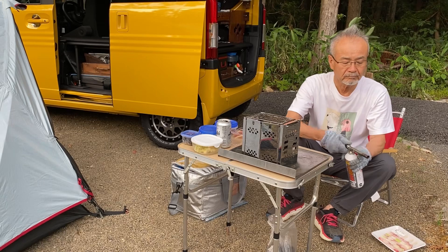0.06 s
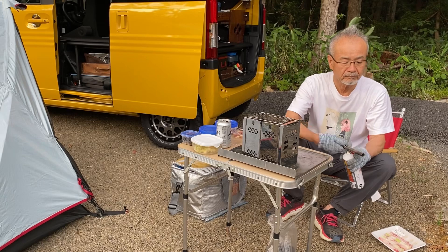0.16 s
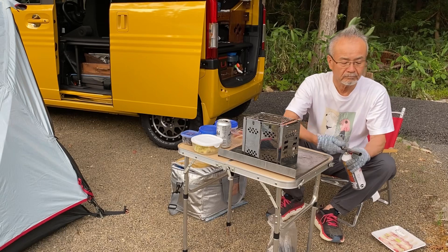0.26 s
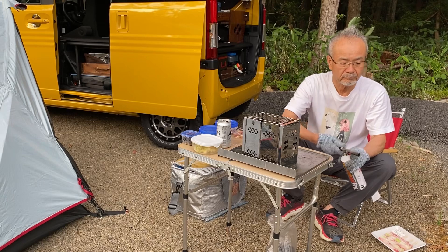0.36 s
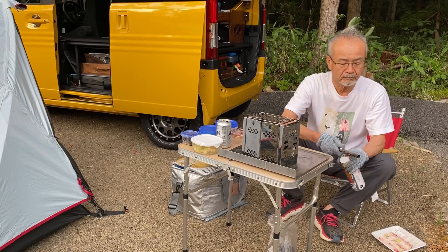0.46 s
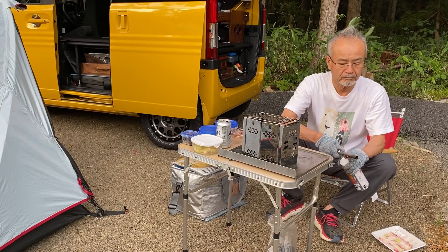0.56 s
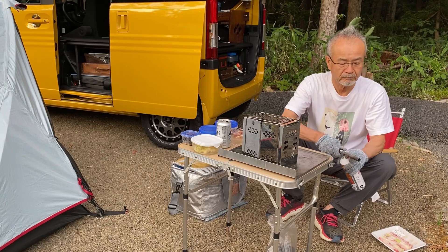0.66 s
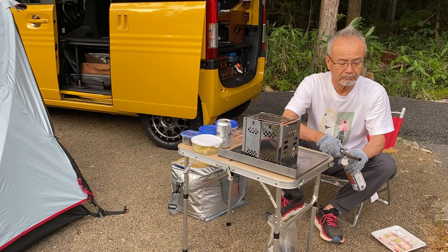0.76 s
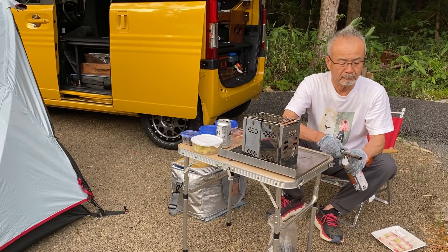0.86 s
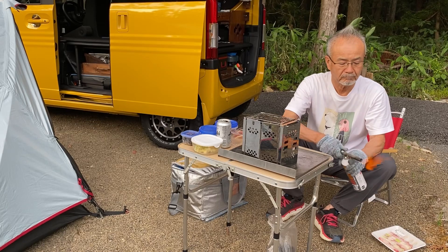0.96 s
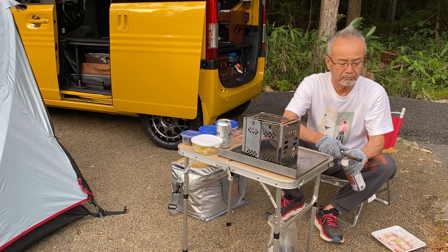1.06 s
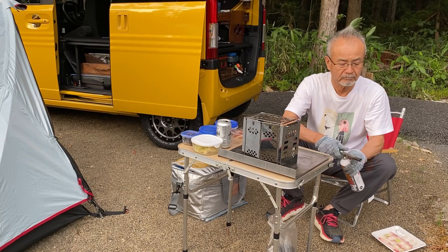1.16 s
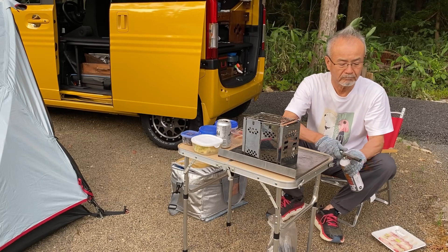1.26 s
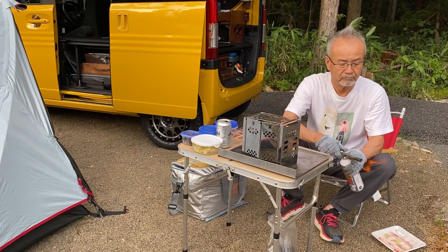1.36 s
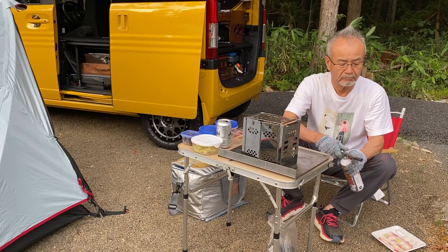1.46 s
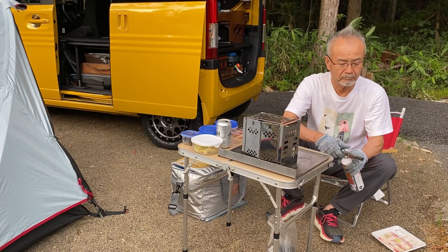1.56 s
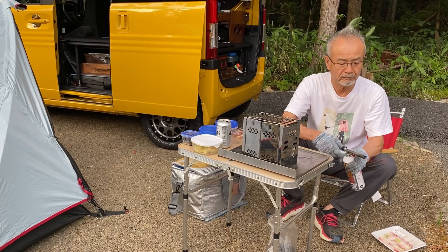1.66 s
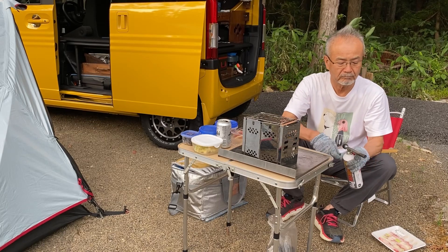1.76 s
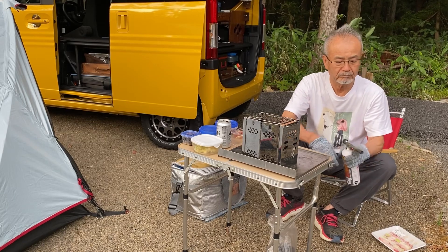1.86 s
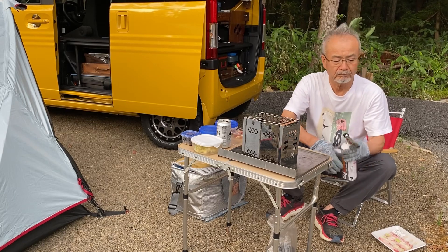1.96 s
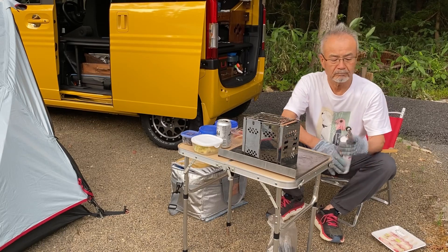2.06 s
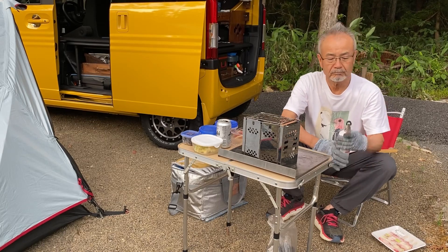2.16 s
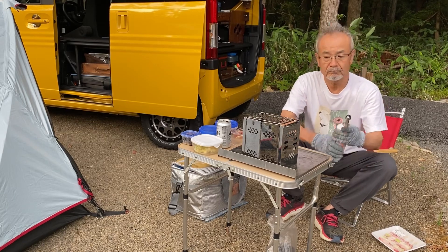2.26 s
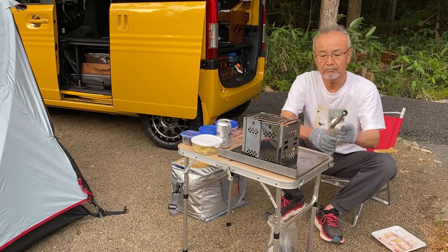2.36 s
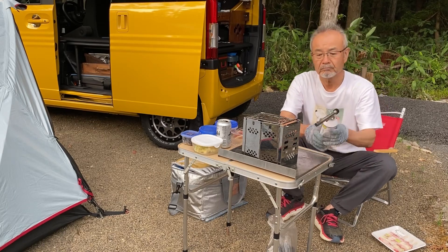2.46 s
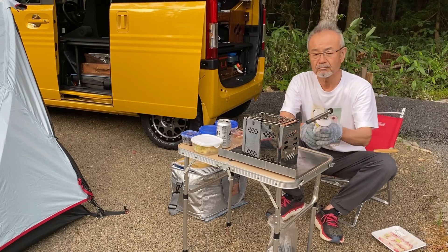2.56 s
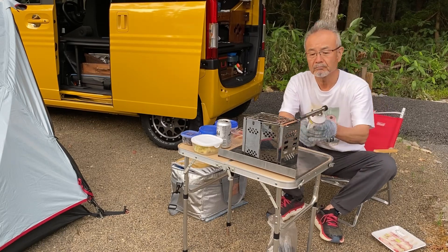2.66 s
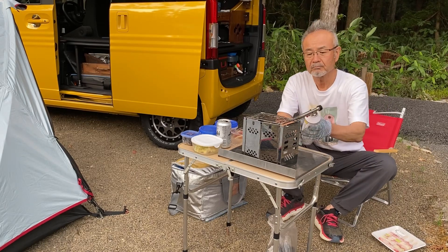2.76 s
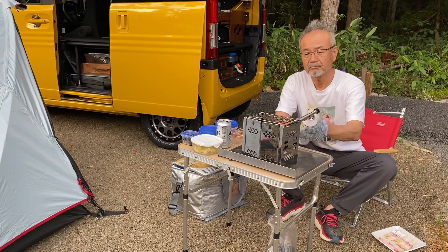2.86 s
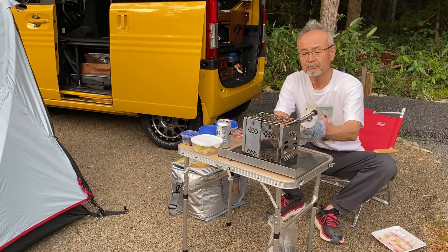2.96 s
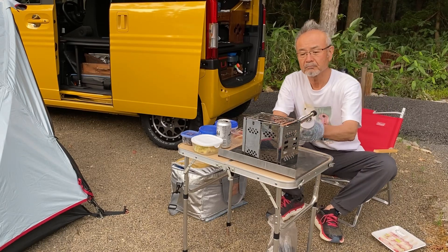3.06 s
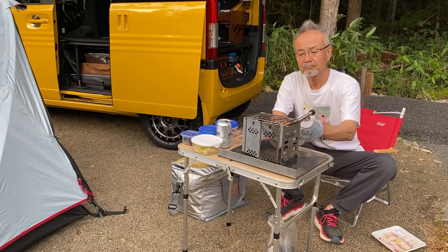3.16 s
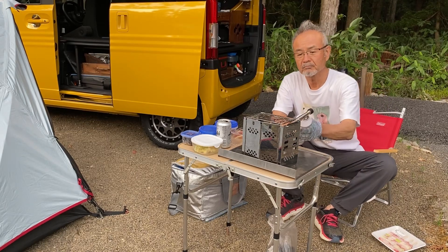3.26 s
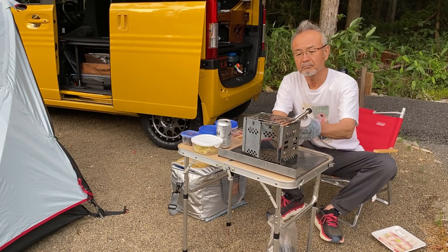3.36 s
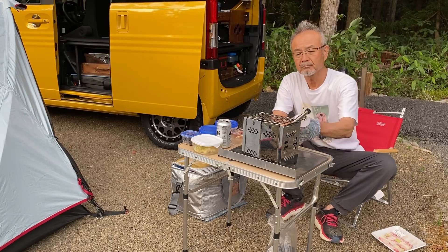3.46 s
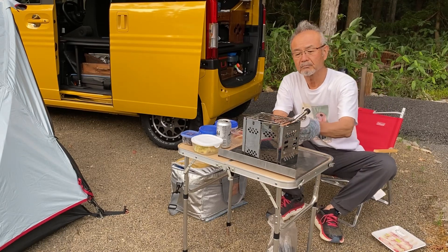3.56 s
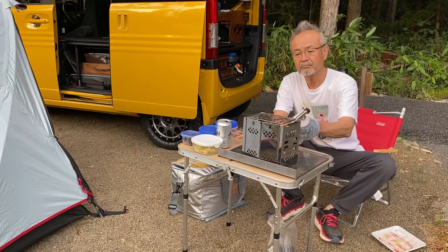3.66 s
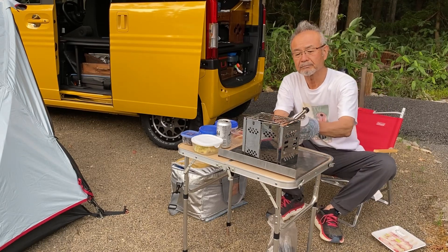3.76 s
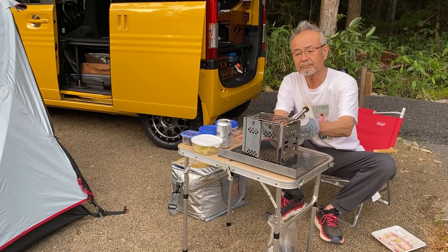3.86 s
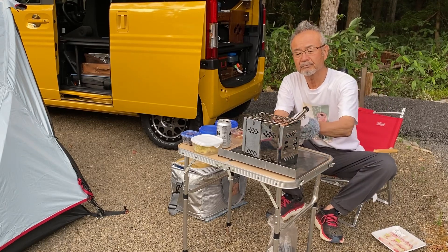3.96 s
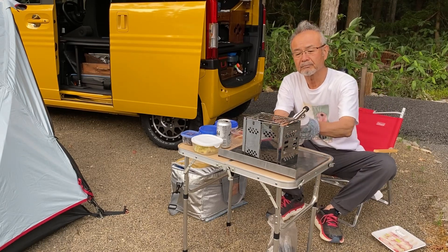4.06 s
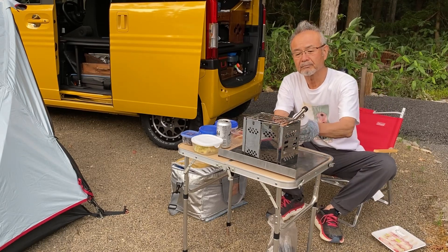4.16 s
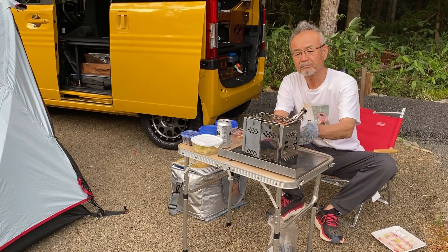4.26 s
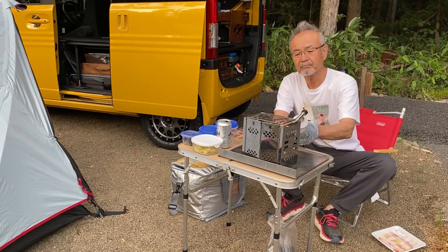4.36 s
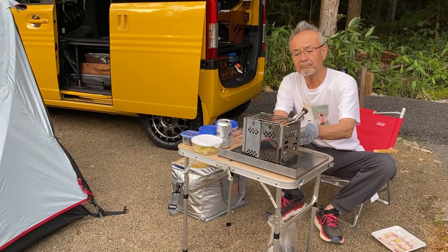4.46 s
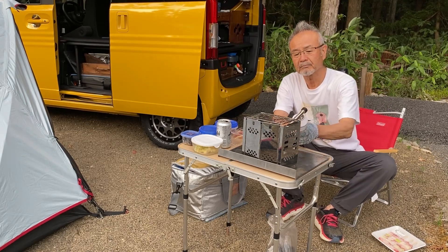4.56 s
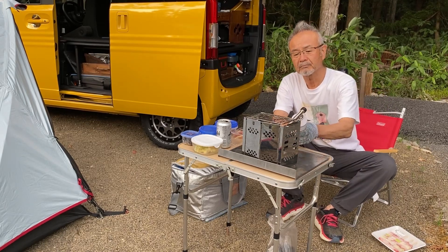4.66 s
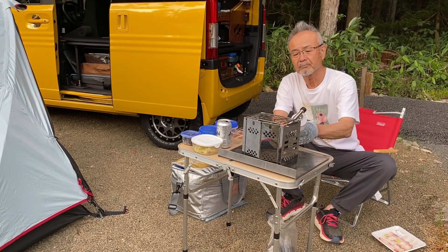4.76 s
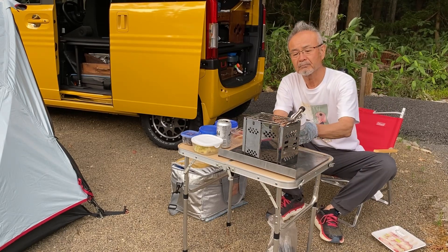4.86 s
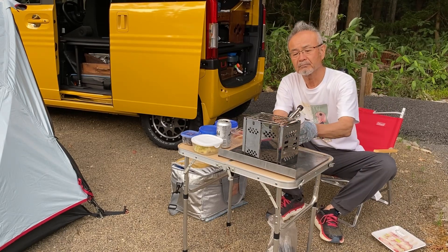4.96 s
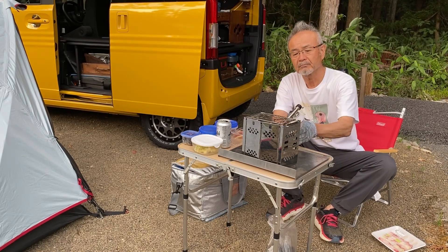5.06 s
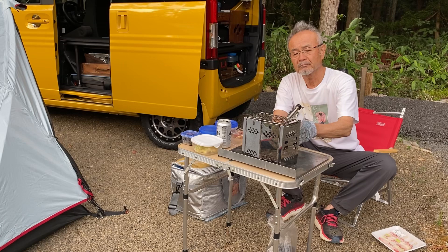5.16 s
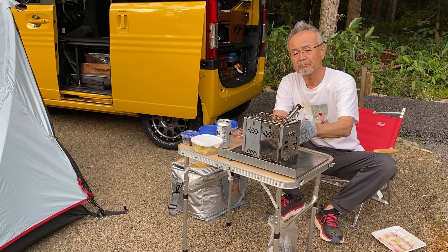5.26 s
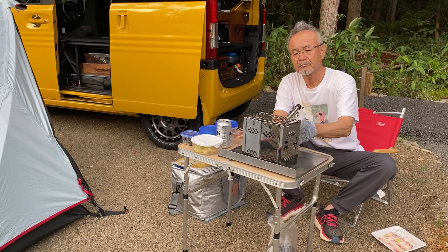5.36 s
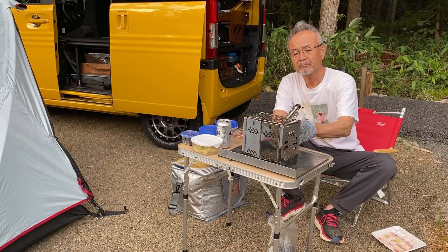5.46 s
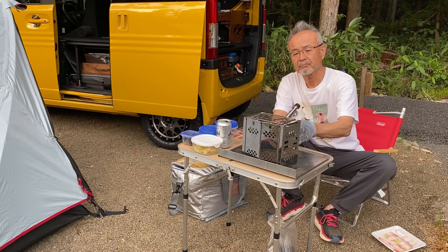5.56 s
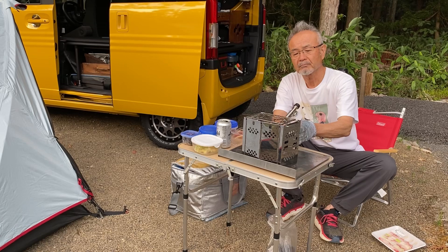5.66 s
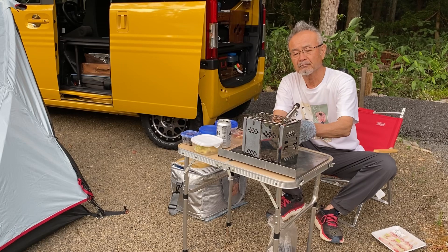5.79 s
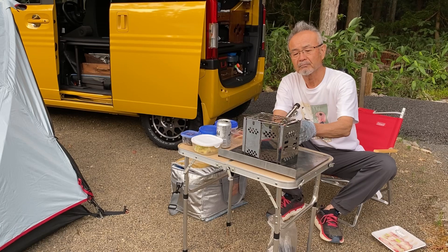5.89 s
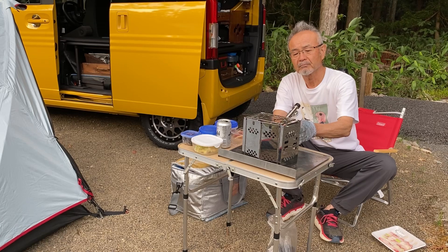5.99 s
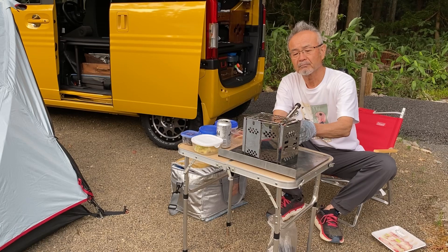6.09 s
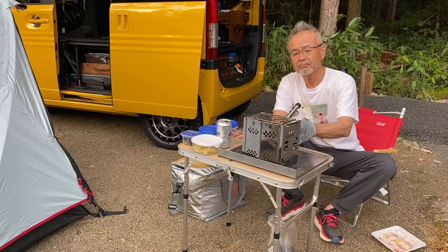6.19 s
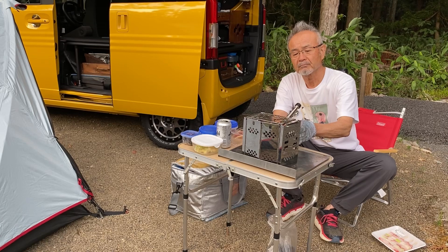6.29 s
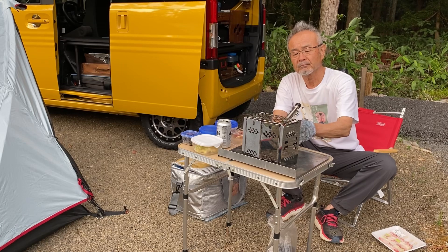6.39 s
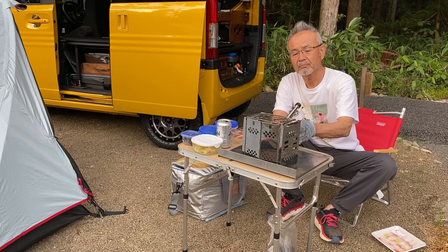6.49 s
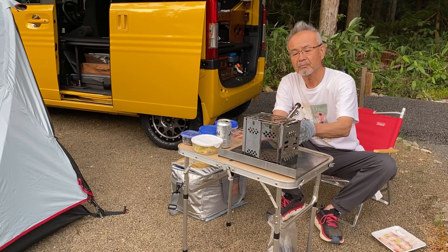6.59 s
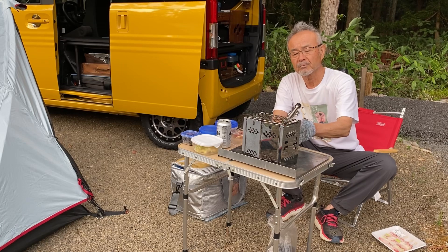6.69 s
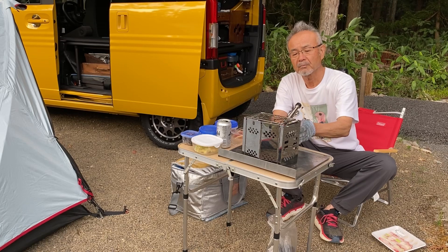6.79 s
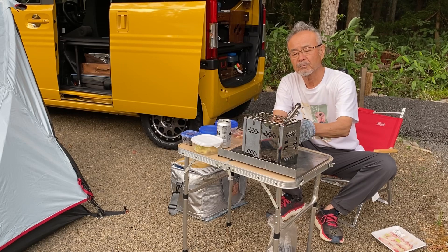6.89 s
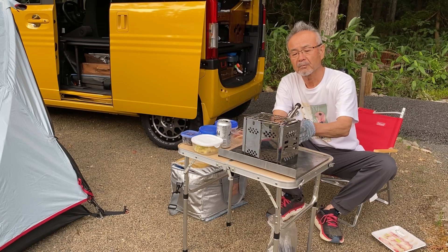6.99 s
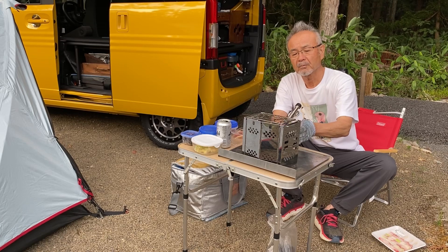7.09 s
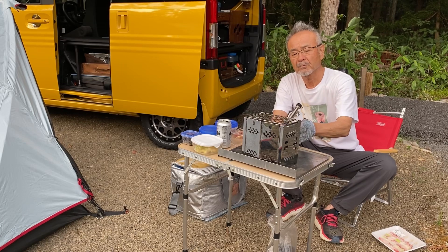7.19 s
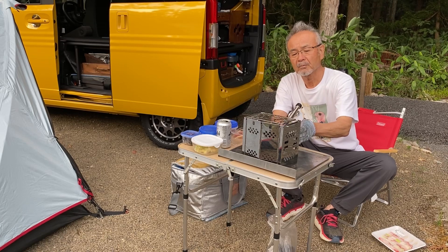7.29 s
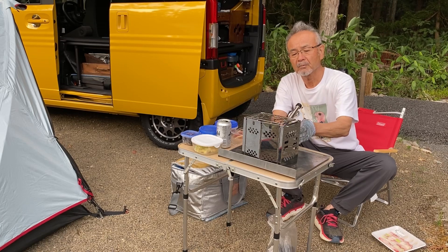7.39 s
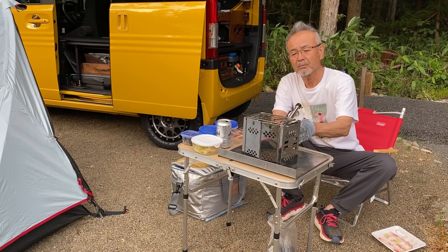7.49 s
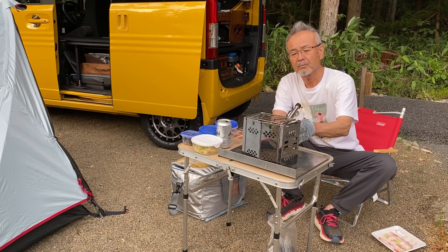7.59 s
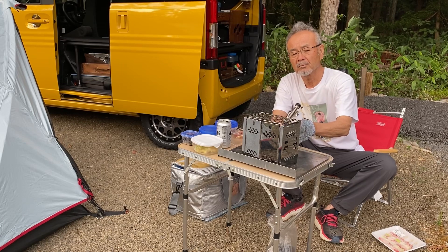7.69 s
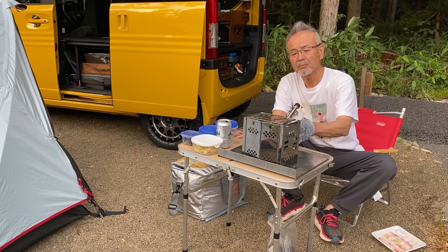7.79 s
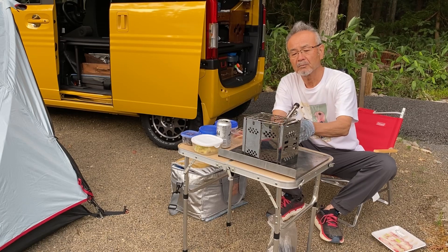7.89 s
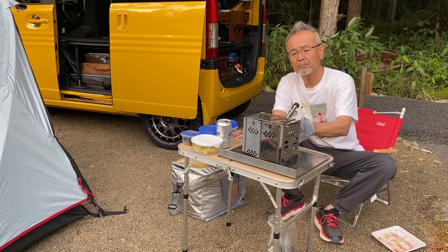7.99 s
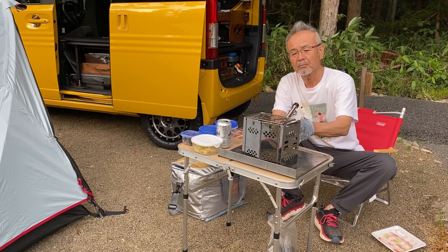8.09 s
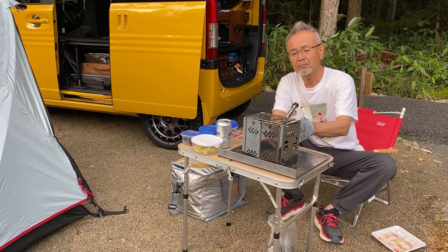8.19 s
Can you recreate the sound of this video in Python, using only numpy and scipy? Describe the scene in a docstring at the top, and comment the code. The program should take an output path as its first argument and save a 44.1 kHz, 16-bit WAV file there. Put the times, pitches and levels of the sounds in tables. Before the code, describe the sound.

A quiet, wide woodland floor with very faint high tones opens the scene, with a soft, dull hand knock at once and barely felt low air movement. At about 0.5 s a tiny valve tick releases a thin, bright gas hiss. At 0.8 s a sharp spark snaps and the flame catches: a quick bright burst, a low thump and several soft puffs until 1 s. A low-mid, breathy roar follows, flickering rapidly, with the hiss still on top. From 2 to 2.6 s the torch is lifted to the metal grill; a hollow, comb-like colour slides and the roar grows fuller and darker. From 3 s to the end at about 8 s it burns continuously, swelling and dipping, with deep buffeting thuds, strongest near 3.5, 4.3 and 6.5 s, and sparse dry charcoal snaps, notably at 4.3, 4.9 and 7.5 s. Outdoor stereo, microphone a few metres away, little reverberation.

```python
"""Gas torch over a charcoal grill

A gas torch hisses from its nozzle, is sparked alight and roars: shaped noise with flickering gains.
Lifted from knee height onto a small metal grill, its sound is combed by a ground echo whose delay slides.
Soft rings mark a hand knock and the catching flame; low thuds and buffeting are pushes of air.
Short noise cracks make the valve tick, spark and charcoal snaps, over a faint woodland floor and two tones."""
import sys
import numpy as np
from scipy import signal
from scipy.fft import rfft, irfft
from scipy.io import wavfile
from scipy.ndimage import uniform_filter1d

SR = 44100
rng = np.random.default_rng(int(sys.argv[2]) if len(sys.argv) > 2 else 0)


def to_wav(sig):
    """Store sig (one row per channel, or 1-D mono) as 16-bit WAV at the path in sys.argv[1].

    Samples outside -1..1 are clipped; the rate is SR.
    """
    pcm = np.clip(np.atleast_2d(sig), -1, 1) * 32767
    pcm = np.round(pcm).astype(np.int16)
    wavfile.write(sys.argv[1], SR, pcm.T)  # frames by channels


def rack_gain(trim_db):
    """Turn a fader trim in dB into the linear factor to multiply a signal by."""
    fader = np.asarray(trim_db, float)
    return 10 ** (fader / 20)


N = 363384
SIZE, HOP = 2048, 512  # short-time spectrum: window and step in samples
HZ = np.fft.rfftfreq(SIZE, 1 / SR)[:, None]
FRAME_S = np.arange(N // HOP + 5) * HOP / SR
T = np.arange(N) / SR
LIT_S = 0.808
STRAIGHT = np.ones((2, 1, 1))  # sources all around, without the torch's path


def evened(x):
    """Normalisation: scales a signal to rms 1."""
    return x / np.sqrt(np.mean(x ** 2) + 1e-20)


def read(points, hz=HZ):
    """Spectral envelope: straight lines between points on a log-frequency axis."""
    f, value = np.transpose(points)
    return np.interp(np.log(hz + 1), np.log(f + 1), value)


def column(rows, k, t):
    """Time envelope: straight lines between the values of column k, at times t."""
    rows = np.array(rows)
    return np.interp(t, rows[:, 0], rows[:, k])


def flicker(hz, depth_db):
    """Amplitude modulation: a random gain of rms 1, wavering above 3 Hz and ever less beyond hz."""
    f = np.fft.rfftfreq(N, 1 / SR)
    weight = (f > 3) / (1 + (f / hz) ** 2)
    wobble = irfft(rfft(rng.standard_normal(N)) * weight, N)
    return evened(rack_gain(depth_db * evened(wobble)))


def wander(hz):
    """Superposition: 24 slow sines from hz/10 to hz drift at frame rate, rms 1."""
    total = 0
    for f in np.geomspace(hz / 10, hz, num=24):
        total = total + np.sin(2 * np.pi * (f * FRAME_S + rng.random())) / np.sqrt(f)
    return evened(total)


def noise(field_db, ports, same, gain, patchy_db):
    """Filtered noise: random spectra in drifting patches, played at a gain, then sent along a path."""
    a, b, c, d, patches = rng.standard_normal((len(FRAME_S), len(HZ), 5)).T
    patches = uniform_filter1d(patches, size=20, axis=0)  # smooth over frequency
    patches = evened(uniform_filter1d(patches, size=6, axis=1))  # smooth over time
    same = np.clip(same, 0, 1)
    left = a + 1j * b
    right = same * left + np.sqrt(1 - same ** 2) * (c + 1j * d)
    shape = rack_gain(field_db)
    power = (shape ** 2).mean(0)
    spectra = np.array([left, right]) * shape / np.sqrt(power)
    spectra = spectra * rack_gain(patchy_db * patches)
    source = signal.istft(spectra, nperseg=SIZE, noverlap=SIZE - HOP)[1][:, :N]
    played = signal.stft(evened(source) * gain, nperseg=SIZE, noverlap=SIZE - HOP)[2]
    # the path colours, the gain sets the level
    passed = (abs(shape * ports.mean(0)) ** 2).mean(0)
    steady = ports * np.sqrt(power / passed)
    heard = played * steady[..., :played.shape[-1]]
    return signal.istft(heard, nperseg=SIZE, noverlap=SIZE - HOP)[1][:, :N]


# burning before the flare is added: (t/s, roar level/dB, rush level/dB, buffeting level/dB)
BURN_LEVELS = [(.86, -33, -41, -43), (.9, -38, -44, -46), (.95, -33, -44, -42), (1.1, -32, -43, -44.5),
               (1.5, -32, -44.5, -37), (2.0, -32.5, -39.5, -36), (2.25, -29, -41, -41),
               (2.9, -29, -40, -34.5), (3.4, -29.5, -37.5, -31.5), (3.65, -30, -43, -34),
               (4.2, -29, -43, -32), (4.4, -33, -42.5, -39), (4.55, -30, -41.5, -33.5),
               (5.45, -29, -43.5, -32), (5.7, -35, -47, -36), (6.1, -29, -42.5, -37.5),
               (6.35, -32, -45.5, -38), (6.55, -30, -42, -37), (6.95, -33, -46, -34.5),
               (7.6, -27.5, -41, -34.5), (7.9, -29.5, -42, -35), (8.2, -29.5, -37, -33)]
# flare of the gas cloud at lighting: (roar level/dB, rush level/dB, buffeting level/dB)
FLARE_RISE = (11, 23, 20)
# time for that rise in dB to die to 1/e: (roar t/s, rush t/s, buffeting t/s)
FLARE_DECAY = (0.013, 0.0077, .03)


def burning(k):
    """Exponential relaxation: level in dB of part k of the flame, its flare dying after lighting."""
    since_lit = np.maximum(T - LIT_S, 0)
    return column(BURN_LEVELS, k + 1, T) + FLARE_RISE[k] * np.exp(-since_lit / FLARE_DECAY[k])


# relative burning spectrum away from the grill: (f/Hz, level/dB)
FREE_SPECTRUM = [(70, -58), (110, -9), (200, -5), (450, 0), (700, -11), (1200, -15), (2400, -21),
                 (3500, -32.5), (4500, -32.5), (5500, -28), (7000, -41)]
# relative burning spectrum on the grill: (f/Hz, level/dB)
GRILL_SPECTRUM = [(60, -51), (110, 0.5), (200, -5.5), (330, -6), (390, -1.5), (490, -9.5), (590, -5.5),
                  (635, -11.5), (680, -9.5), (800, -12.5), (860, -17), (1000, -15.5), (1380, -19),
                  (1450, -27.5), (1600, -23), (2000, -27.5), (3000, -34.5), (4500, -43.5), (7000, -50)]
# slow level changes of three bands of the burning: (t/s, low level/dB, middle level/dB, upper level/dB)
BAND_LEVELS = [(2.5, -0.5, -2.5, 4), (3.2, 4, 4.5, 2), (3.8, 0, 1.5, 2), (4.4, 0.5, 1, 5.5),
               (5.2, 0.5, 4, 8.5), (5.7, -4.5, -4.5, 5.5), (6.2, -3, 2, 4), (6.7, -3, -5, 1),
               (7.1, 0, 2.5, 0), (7.5, 1.5, 4, -0.5), (8.2, -1, -1, 5.5)]
# those three bands: (centre f/Hz, half width to 1/e of the dB, f/Hz)
BAND_SHAPES = [(950, 150), (2300, 570), (3200, 260)]
# likeness of left and right, also for the hiss: (f/Hz, share in common 0-1)
LIKENESS = [(60, .99), (450, .995), (1200, .97), (2500, .85), (3500, .9), (4300, .99), (15000, .985)]


def flame(ports, onto):
    """Turbulent combustion noise: a lumpy roar and a rush above it, flickering together."""
    field_db = (1 - onto) * read(FREE_SPECTRUM) + onto * read(GRILL_SPECTRUM)
    for k, (hz, width) in enumerate(BAND_SHAPES):
        bump = np.exp(-((HZ - hz) / width) ** 2)
        field_db = field_db + column(BAND_LEVELS, k + 1, FRAME_S) * bump
    # roar and rush cross over at 950 Hz
    upper_db = -10 * np.log10(1 + (950 / (HZ + 1)) ** 6)
    lower_db = -10 * np.log10(1 + (HZ / 950) ** 6)
    lumps = flicker(hz=19, depth_db=1.0)
    rush_lit = np.clip((T - 0.805) / 0.009, 0, 1)  # the treble catches first
    roar_lit = np.clip((T - LIT_S) / 0.012, 0, 1) ** 2
    rush_gain = lumps * rush_lit * rack_gain(burning(1))
    roar_gain = lumps * roar_lit * rack_gain(burning(0)) * flicker(hz=44, depth_db=-0.06)
    roar = noise(field_db + lower_db, ports, read(LIKENESS), roar_gain, patchy_db=0.26)
    rush = noise(field_db + upper_db, ports, read(LIKENESS), rush_gain, patchy_db=1.05)
    return roar + rush


# level of the gas hiss, which sags now and then: (t/s, level/dB)
JET_LEVELS = [(.49, -53), (.62, -45.5), (1.2, -45.5), (1.62, -42.5), (1.9, -45.5), (2.42, -49.5),
              (2.5, -44), (2.65, -42.5), (2.78, -49.5), (2.92, -42.5), (3.07, -45.5), (3.3, -40.5),
              (3.5, -40.5), (3.69, -48), (3.88, -44), (3.96, -50), (4.05, -44.5), (4.17, -49.5),
              (4.3, -44.5), (4.55, -50.5), (4.85, -43.5), (5.2, -45.5), (5.32, -50.5), (5.55, -44),
              (5.73, -48.5), (5.85, -46.5), (6.4, -43), (6.53, -54), (6.72, -47), (7.1, -52), (7.33, -47.5),
              (7.48, -49), (7.6, -45), (8.0, -53), (8.24, -48)]
# relative spectrum of the hiss: (f/Hz, level/dB)
JET_SPECTRUM = [(500, -11), (1000, -13.5), (1300, 1), (1670, -15.5), (2500, -15.5), (3050, -10.5),
                (3800, -29.5), (4600, -17.5), (6000, -9.5), (7500, -4), (9000, -9), (11000, -11),
                (13500, -18), (15600, -14)]
# slow level of the treble against the hiss: (t/s, level/dB)
JET_TREBLE = [(.5, 2.5), (1.5, 0.5), (2.6, 1.5), (3.3, -3.5), (3.7, -4), (4.05, 0.5), (4.5, -2.5),
              (5.1, -0.5), (6.3, 0.5), (7, 4), (7.8, -1), (8.2, 1)]
PEAK_HZ, PEAK_WANDER_HZ = 6640, 70  # mean centre of the broad peak and its rms drift
PEAK_HALF_WIDTH_HZ, PEAK_RISE_DB = 400, 12.9
# before each frame is levelled, the top air follows this share of the hiss and wavers on its own
TREBLE_FOLLOWS, TREBLE_WAVER_DB = 0.85, 0.5


def jet(ports):
    """Turbulent jet noise: nozzle hiss with a broad drifting peak, as of a microphone resonance."""
    peak_hz = PEAK_HZ + PEAK_WANDER_HZ * wander(hz=4.4)
    peak_db = PEAK_RISE_DB / (1 + ((HZ - peak_hz) / PEAK_HALF_WIDTH_HZ) ** 2)
    hiss_db = column(JET_LEVELS, 1, FRAME_S)
    air_db = (TREBLE_FOLLOWS - 1) * (hiss_db - hiss_db.mean())
    air_db = air_db + TREBLE_WAVER_DB * wander(hz=16) + column(JET_TREBLE, 1, FRAME_S)
    top = np.clip((HZ - 8000) / 1500, 0, 1)
    field_db = read(JET_SPECTRUM) + peak_db + top * air_db
    opened = np.clip((T - 0.484) / 0.0042, 0, 1)
    gain = rack_gain(column(JET_LEVELS, 1, T)) * opened * flicker(hz=20, depth_db=1.0)
    return noise(field_db, ports, read(LIKENESS), gain, patchy_db=2.2)


# relative spectrum of the buffeting: (f/Hz, level/dB)
BUFFET_SPECTRUM = [(12, -56), (25, -32), (36, -5.5), (48, 7), (70, 2), (118, -5), (146, -4), (170, -17),
                   (220, -42), (370, -120)]
# lift of the deepest buffeting, which grows near the grill: (t/s, level/dB)
BUFFET_DEPTH = [(0, 2), (.75, 9), (.9, -32), (2.3, -32), (2.8, -4), (5.5, -4.5), (6, -10), (7.2, -5),
                (8, 6)]
# single low thuds of air, each a sine before its envelope: (t/s, amplitude level/dB, f/Hz)
AIR_THUDS = [(0.137, -44, 67), (0.251, -40, 72), (0.585, -40, 84), (0.82, -23, 118), (.845, -27, 65),
             (1.382, -23, 128), (1.559, -26, 107), (2.076, -19, 128), (3.011, -24, 99), (3.197, -22.6, 88),
             (3.303, -19, 81.5), (3.43, -26, 91), (3.517, -15, 81.6), (3.91, -22.5, 89),
             (4.258, -16.5, 77.6), (4.879, -21, 83), (5.027, -18, 91), (5.477, -20, 82), (5.597, -18.6, 95),
             (6.124, -20, 89), (6.538, -16, 91), (7.385, -21, 80), (7.612, -21.9, 87), (8.061, -17.5, 114),
             (8.187, -22, 67)]
BREEZE_DB = -52.5  # low buffeting before lighting
THUD_CYCLES = 0.5  # half width of a thud, to 1/e


def buffet():
    """Low-frequency pressure fluctuation: near-mono lumps, and thuds of about one cycle."""
    field_db = read(BUFFET_SPECTRUM) + column(BUFFET_DEPTH, 1, FRAME_S) / (1 + (HZ / 60) ** 4)
    level_db = np.where(T < LIT_S, BREEZE_DB, burning(2))
    thuds = np.zeros(N)
    offsets = np.arange(-2000, 2000)
    for s, db, hz in AIR_THUDS:
        cycles = hz * offsets / SR
        thud = rack_gain(db) * np.sin(2 * np.pi * cycles) * np.exp(-(cycles / THUD_CYCLES) ** 2)
        at = round(s * SR) + offsets
        inside = at >= 0
        thuds[at[inside]] += thud[inside]
    gain = rack_gain(level_db) * flicker(hz=12.0, depth_db=2.5)
    return thuds + noise(field_db, STRAIGHT, 0.93, gain, patchy_db=1.0)


# a knock of the hand, then the flame front catching: (t/s, peak level/dB, f/Hz, t60/s)
SOFT_PUFFS = [(.021, -36.5, 99, 0.15), (0.029, -47.5, 453, 0.027), (0.8153, -23, 406, 0.042),
              (0.821, -32, 228, 0.045), (0.84, -29, 470, 0.0099), (0.861, -21, 493, 0.047),
              (.911, -28, 442, 0.036), (0.934, -28.5, 470, 0.054), (.975, -26, 425, 0.055)]


def catches():
    """Damped oscillation: each puff is a short soft-edged ring, alike in both ports."""
    out, t = np.zeros(N), np.arange(4000) / SR
    for s, db, hz, t60 in SOFT_PUFFS:
        soft_edge = 1 - np.exp(-t / 0.0019)
        ring = np.sin(2 * np.pi * hz * t) * soft_edge * rack_gain(-60 * t / t60)
        out[round(s * SR):][:4000] += rack_gain(db) * ring / abs(ring).max()
    return np.array([out, out])


# valve tick, spark and charcoal snaps; 0.6 of the pan is the added left minus right:
# (t/s, bright peak level/dB, low part against it level/dB, t60 of the raw noise/s, pan level/dB)
CRACKS = [(0.4866, -59, -6, 0.008, 0.0), (0.803, -21.5, -7, 0.0097, -6), (3.001, -34, 9.5, 0.008, -9),
          (3.6745, -42, -7, 0.008, -7), (3.714, -44, -10, 0.008, 4), (3.912, -35, -6, 0.0089, 3),
          (4.222, -33, -10, 0.008, -3), (4.343, -29, -10, 0.008, 6), (4.352, -27.5, -16, 0.019, -6),
          (4.877, -27.5, -17, 0.011, 2), (5.333, -32, -13, 0.0091, 7), (6.4528, -38.5, 11.5, 0.0062, 10),
          (7.113, -32.5, -11, 0.012, 3), (7.4505, -37, -11, 0.01, 6), (7.5246, -29, -5, 0.0098, 4),
          (8.064, -38, 3, 0.0068, -3)]


def snaps(ports):
    """Impulsive excitation: short noise cracks, bright and lower parts, along the torch's path."""
    out, t, hz = np.zeros((2, N)), np.arange(SIZE) / SR, HZ[:, 0]
    bright = rack_gain(np.interp(hz, [4000, 7900, 15500, 15900], [-13, 5, 1, -30]))
    low = rack_gain(np.interp(hz, [300, 1200, 5000, 8000], [-25, 12.5, -1.5, -42]))
    for s, db, low_db, t60, pan_db in CRACKS:
        burst = rng.standard_normal(SIZE) * rack_gain(-60 * t / t60)
        burst = np.roll(burst, 64)  # room for the filters to ring ahead
        crack = rfft(burst) * ports[:, :, round(s * SR / HOP)]
        top = irfft(crack * bright, SIZE)
        body = irfft(crack * low, SIZE)
        top = top / abs(top.mean(0)).max()
        body = body / abs(body.mean(0)).max()
        sides = rack_gain(np.array([[0.3], [-0.3]]) * pan_db)
        start = round((s + 0.0008) * SR) - 64
        out[:, start:][:, :SIZE] += rack_gain(db) * sides * (top + rack_gain(low_db) * body)
    return out


# relative spectrum of the woodland floor: (f/Hz, level/dB)
FLOOR_SPECTRUM = [(88, -37), (150, -1), (246, 2), (418, -8), (685, -8.5), (910, -14.5), (2790, -17.5),
                  (5850, -29.5), (6810, -23), (8550, -45), (14000, -36)]
# faint steady tones: (f/Hz, level/dB of the amplitude before a 4.5 dB lift)
FAINT_TONES = [(1556, -79), (2875, -78.5)]
FLOOR_DB = -58.5


def woods():
    """Diffuse field: a wide, smooth outdoor floor with two faint tones."""
    tones = 0
    for hz, db in FAINT_TONES:
        tone = np.sin(2 * np.pi * (hz * T + rng.random()))
        tones = tones + rack_gain(db + 4.5) * tone * flicker(hz=25, depth_db=0.5)
    field_db = read(FLOOR_SPECTRUM) + 0 * FRAME_S  # the same in every frame
    return tones + noise(field_db, STRAIGHT, 0.6, rack_gain(FLOOR_DB), patchy_db=0.6)


# torch position: (t/s, extra path of the ground echo/ms, share of the way onto the grill 0-1,
# echo strength 0-1)
TORCH_LIFT = [(0.5, 1.64, 0.27, 0.7), (1.3, 1.7, 0.0, 1), (1.85, 1.71, 0.16, 1), (2.1, 1.87, 0.22, 1),
              (2.3, 2.04, 0.16, 0.83), (2.6, 2.47, 0.74, 0.65), (3.1, 2.41, 0.88, 0.87),
              (8.2, 2.395, 1.0, 1)]
# ground reflection, weaker in the treble: (f/Hz, amplitude share)
GROUND_ECHO = [(100, 0.98), (900, 0.96), (1500, 0.7), (3300, 0.5), (4500, 0.4), (7000, 0.27), (9000, 0.15)]
# part of it left when table and grill screen the ground: (f/Hz, share)
GROUND_SCREENED = [(200, 0.81), (600, 0.42), (1000, 0.31), (1500, 0.13), (2200, 0.056), (4000, 0.11)]
# grill and table reflections, as signed shares of the ground echo: (delay/ms, left share, right share)
TABLE_ECHOES = [(1.3, -0.6, -0.46), (2.7, 0.49, 0.77), (3.8, 0.3, 0.28)]
# left-right phase, away from the grill: (f/Hz, phase/rad)
PHASE_FREE = [(0, 0), (1200, -1.5), (2400, -2.8), (3400, -1.6), (4300, -.1), (6000, 0), (6500, .6)]
# left-right phase, on the grill: (f/Hz, phase/rad)
PHASE_GRILL = [(0, -0.14), (2150, -0.92), (3500, -1.03), (4650, -1.8), (6000, -0.75), (6900, 0.11)]
# left-right phase rising unevenly through the treble, shared by both places: (f/Hz, phase/rad)
PHASE_TOP = [(7400, 1.6), (8300, 2.7), (9700, 3.6), (11100, 5.7), (13200, 6.8), (14200, 8.8), (15800, 9.7)]
# left minus right tilt, away from the grill: (f/Hz, level/dB)
BALANCE_FREE = [(200, 0), (640, -3), (1400, -6.5), (3300, -9), (4300, -.5), (6000, 0)]
# left minus right tilt, on the grill: (f/Hz, level/dB)
BALANCE_GRILL = [(200, 2.5), (640, -3), (1400, -1.5), (3100, -3), (5500, -11), (7000, 2.5), (8500, 1)]


def path():
    """Comb-filter interference: direct sound plus echoes at each port, as ports x bins x frames."""
    onto = np.clip(column(TORCH_LIFT, 2, FRAME_S), 0, 1)
    screening = 1 - onto + onto * read(GROUND_SCREENED)
    bounce = np.clip(read(GROUND_ECHO), 0, 1) * column(TORCH_LIFT, 3, FRAME_S) * screening
    # soft soil turns the phase of the bass
    lead = np.exp(0.35j * (1 - onto) * np.clip(1.5 - HZ / 600, 0, 1))
    delay = np.exp(-2j * np.pi * HZ * column(TORCH_LIFT, 1, FRAME_S) / 1000)
    ground = 1 + bounce * lead * delay
    ports = np.array([ground, ground])
    for ms, *share in TABLE_ECHOES:
        share = np.array(share)[:, None, None]
        ports += share * onto * bounce * np.exp(-2j * np.pi * HZ * ms / 1000)
    free = np.interp(HZ, *np.transpose(PHASE_FREE + PHASE_TOP))
    grill = np.interp(HZ, *np.transpose(PHASE_GRILL + PHASE_TOP))
    phase = (1 - onto) * free + onto * grill
    tilt_db = (1 - onto) * read(BALANCE_FREE) + onto * read(BALANCE_GRILL)
    ports[0] *= rack_gain(tilt_db / 2) * np.exp(1j * phase)
    ports[1] *= rack_gain(-tilt_db / 2)
    return ports, onto


def scene():
    """Linear superposition: all sources add at two microphone ports a few metres away."""
    ports, onto = path()
    torch = flame(ports, onto) + jet(ports) + buffet() + catches()
    return torch + snaps(ports) + woods()


def roll_off(x):
    """The treble ends steeply here."""
    return signal.sosfilt(signal.butter(12, 15710, fs=SR, output="sos"), x)


def record(dry):
    """High-pass filtering: the microphone drops the deepest bass, below 35 Hz."""
    mic_cut = signal.butter(3, 35, "high", fs=SR, output="sos")
    mix = signal.sosfilt(mic_cut, dry)
    return roll_off(mix)


dry = scene()
out = record(dry)
to_wav(out)
```